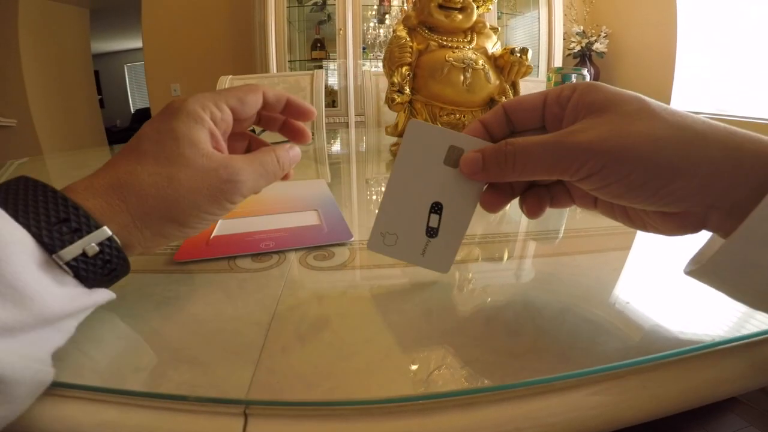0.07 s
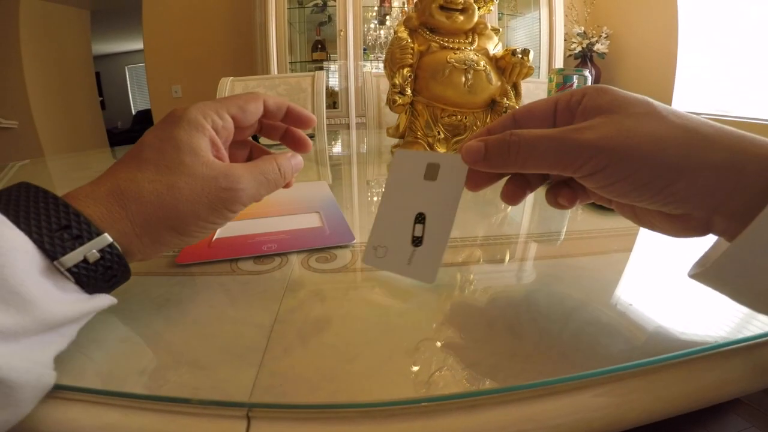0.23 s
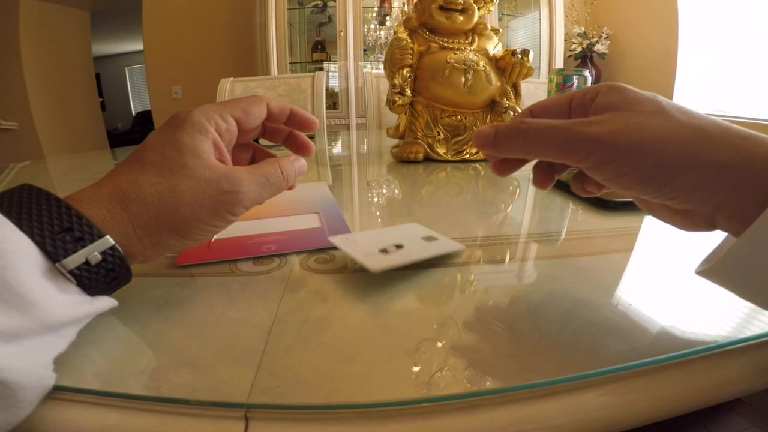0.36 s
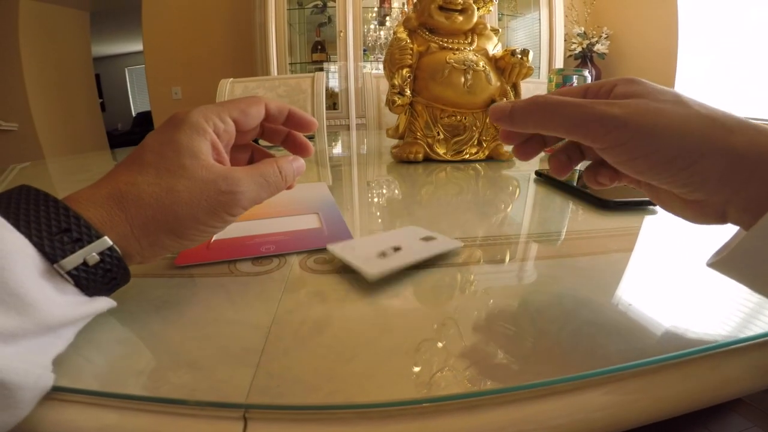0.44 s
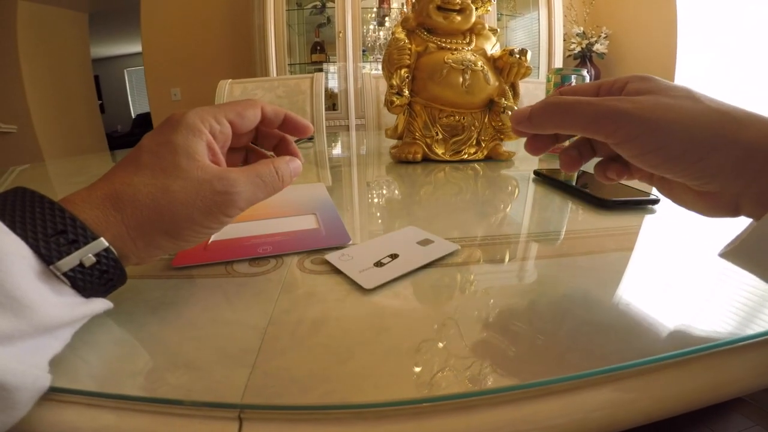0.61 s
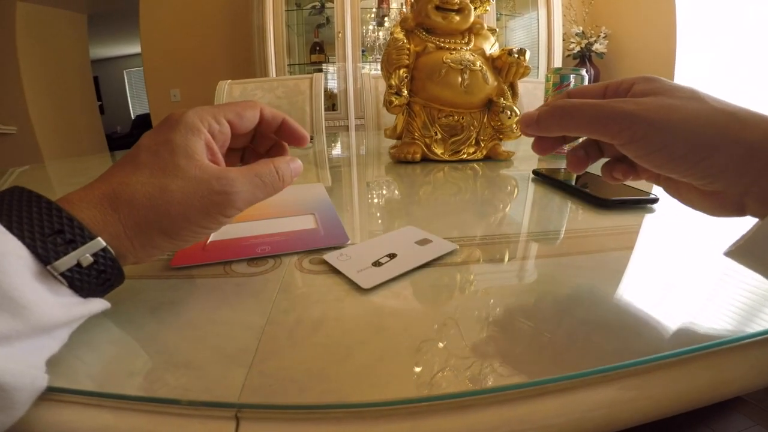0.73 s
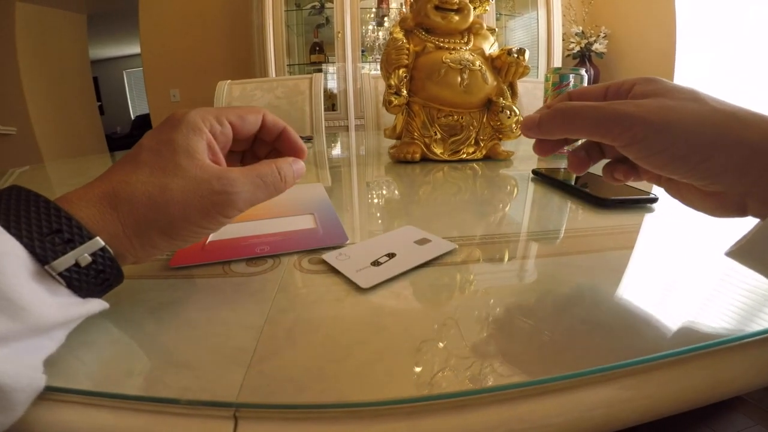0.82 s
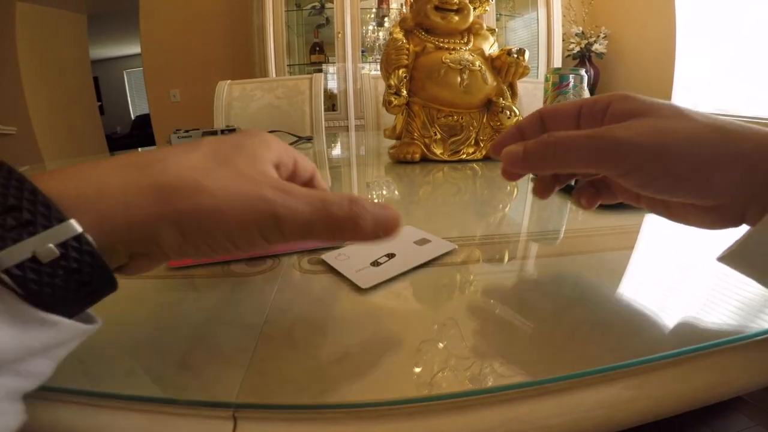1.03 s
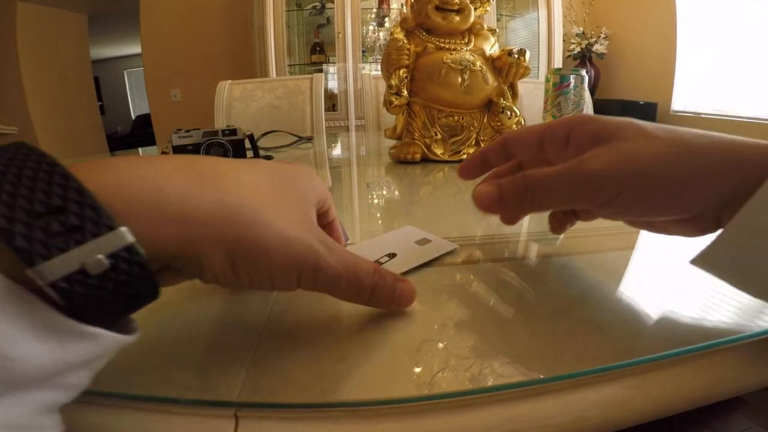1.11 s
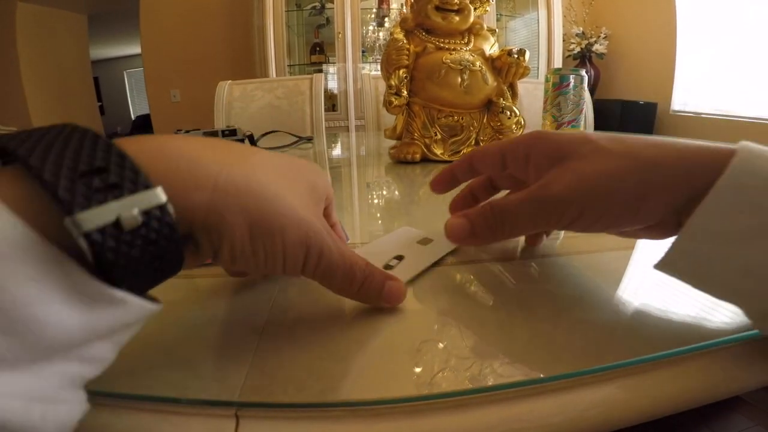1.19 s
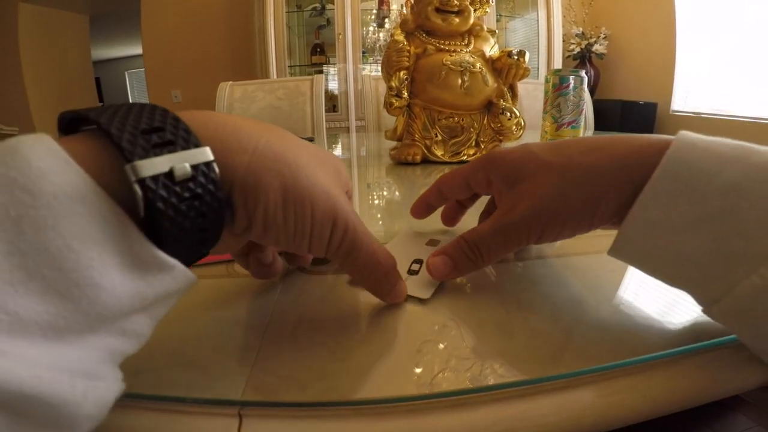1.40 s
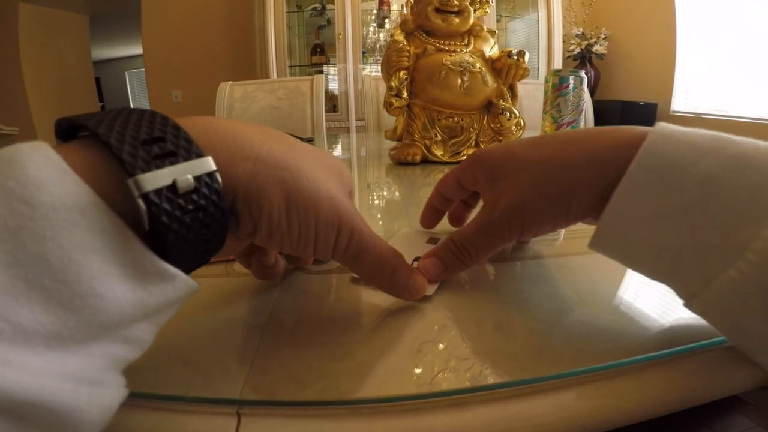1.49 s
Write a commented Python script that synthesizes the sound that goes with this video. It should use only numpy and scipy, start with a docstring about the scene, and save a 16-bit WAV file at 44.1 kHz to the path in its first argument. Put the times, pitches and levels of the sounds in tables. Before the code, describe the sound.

A metal card drops on a glass table, clinking and rattling flat, then faint finger taps.

```python
"""A metal card dropped on a glass table, heard on one microphone in a live room, after a dull knock.
It clinks on a corner and rings the glass, slaps over on a cushion of air, rattles and lies flat
while the room rings on. Then fingers tap the glass and slide the card over it. Sleeves, a rumble
and a faint hum lie underneath; the loudest blows push the recorder's limiter."""
import sys
import numpy as np
from scipy import signal
from scipy.fft import rfft, irfft, next_fast_len
from scipy.io import wavfile
from scipy.ndimage import uniform_filter1d

SR = 44100
rng = np.random.default_rng(int(sys.argv[2]) if len(sys.argv) > 2 else 0)


def wav_out(sig):
    """Save sig, one row per channel (or a flat mono array), as 16-bit PCM at SR to the path in sys.argv[1]."""
    wavfile.write(sys.argv[1], SR, np.round(np.clip(np.atleast_2d(sig).T, -1, 1) * 32767).astype(np.int16))


N = 68355
T = np.arange(N) / SR

# the card meeting the glass: t/s, ring/dB, crack/dB, spot (0 corner, 1 edge), damping/dB (sign unused)
CONTACTS = [(.2480, -16.5, -5.5, 0, 0), (.2750, -25, -20, 0, 1), (.2855, -27.5, -24, 0, 5),
            (.2940, -26.5, -14.5, 0.46, 8), (.3235, -43.5, -26.5, 0, 3.5), (0.3967, -22, 0.5, 1, -1.5),
            (.4035, -22, -5.5, 0.74, 13), (.4235, -36, -19.5, 0.91, 4), (.4578, -29.5, -18, 1, -3),
            (.5115, -35.5, -23.5, 0.71, 9), (.5240, -53, -19, 1, -13), (.5265, -24, -19, 1, 30),
            (.5322, -37, -17.5, 0.6, 36), (.5586, -33, -20.5, 1, 18), (.5770, -27, -17, 0.97, 34),
            (.5855, -40, -30, 1, 24), (.5925, -37.5, -24.5, 0.42, 12.5), (.6020, -37, -25.5, 1, 14),
            (.6140, -39, -33, 0.31, 10), (.6225, -54, -51, 0.81, 27)]
# spectrum of a hard contact: f/Hz, level/dB
CONTACT_SPECTRUM = [(100, -12), (400, -10.5), (700, -5.5), (1300, -3.5), (2000, -9.5), (3200, -9),
                    (4200, -4.5), (6000, -3.5), (8000, -8), (12000, 3), (15000, -3)]


def amp(db):
    """Decibels to gain."""
    return 10 ** (np.asarray(db) / 20)


def along(points, hz):
    """Read (frequency, value) points at hz on a log axis."""
    f, values = np.transpose(points)
    return np.interp(np.log(hz + 1), np.log(f + 1), values)


def filtered(x, response):
    """x through a frequency response."""
    size = next_fast_len(N + SR // 2)
    return irfft(rfft(x, size) * response(np.fft.rfftfreq(size, 1 / SR)), size)[:N]


def noise(spectrum, tilt_db=0, resonance=lambda hz: 1):
    """Coloured noise of rms 1, tilted per octave and shaped by any resonance."""
    white = rng.standard_normal(N)
    x = filtered(white, lambda hz: amp(along(spectrum, hz) + tilt_db * np.log2(hz + 1)) * resonance(hz))
    return x / x.std()


def fade(t60, t=T):
    """A decay of 60 dB in t60 seconds."""
    return amp(-60 * t / t60)


def at(start, x):
    """x delayed by start seconds."""
    return np.pad(x, (max(round(start * SR), 0), 0))[:N]


def ring(modes, scatter_db=4, detune=0.00092):
    """Struck modes as damped sines, a little different at every blow."""
    t = T[:SR // 3]
    x = np.zeros(len(t))
    for hz, db, t60 in modes:
        strength, pitch, phase = rng.standard_normal(3)
        sine = np.sin(2 * np.pi * (hz * (1 + detune * pitch) * t + phase))
        x += amp(db + scatter_db * strength) * fade(t60, t) * sine
    return np.pad(x, (0, N - len(t)))


def background():
    """Room tone at the microphone: moving sleeves, a low rumble, a faint hum and still air."""
    # swells of the sleeves and the rumble: t/s, level/dB
    sleeve_levels = [(0, -49.5), (.5, -50), (.8, -76.5), (1.05, -61.5), (1.2, -52.5), (1.4, -57),
                     (1.55, -50)]
    rumble_levels = [(0, -41), (.12, -48.5), (.45, -35.5), (.65, -57.5), (.93, -51), (1.0, -38),
                     (1.1, -48.5), (1.25, -43.5), (1.55, -41)]
    # spectra of the four layers: f/Hz, level/dB
    sleeve_spectrum = [(40, 4.5), (100, 4), (200, -1), (500, -8.5), (900, -22), (2000, -26), (6000, -40),
                       (15000, -42)]
    rumble_spectrum = [(5, -6), (15, 1), (30, -2.5), (60, -23.5), (120, -38), (400, -71.5)]
    hum_partials = [(99, -63.5), (198, -71.5)]
    air_spectrum = [(30, 9), (100, 3), (300, -7), (1000, -8.5), (4000, -13), (15000, -20.5)]
    sleeves = amp(np.interp(T, *np.transpose(sleeve_levels))) * noise(sleeve_spectrum)
    rumble = amp(np.interp(T, *np.transpose(rumble_levels))) * noise(rumble_spectrum)
    hum = sum(amp(db) * np.sin(2 * np.pi * (hz * T + rng.random())) for hz, db in hum_partials)
    return sleeves + rumble + hum + amp(-65) * noise(air_spectrum)


def slides():
    """Skin and card slide in short, soft swells of hiss."""
    # strokes: centre t/s, Gaussian width/s, level/dB
    strokes = [(0.03, 0.017, -59.5), (0.138, 0.014, -57.5), (1.257, 0.013, -52.5), (1.381, 0.013, -58.5),
               (1.492, 0.048, -64.5)]
    # friction hiss: f/Hz, level/dB
    hiss_spectrum = [(500, -12.5), (2500, -17), (4500, -1.5), (6500, -4), (9000, -2), (13000, -2.5),
                     (15500, -4)]
    swells = sum(amp(db) * np.exp(-.5 * ((T - centre) / width) ** 2) for centre, width, db in strokes)
    return swells * noise(hiss_spectrum)


def knock():
    """One dull, hollow knock with a small tick at first contact."""
    # hollow body: f/Hz, level/dB
    body_spectrum = [(100, -22.5), (330, -14), (530, 2.5), (680, 1.5), (850, -3.5), (1050, -0.5),
                     (1400, 1.5), (1800, -8.5), (2400, -17.5), (5000, -31), (10000, -39), (15000, -48)]
    body = amp(-24) * noise(body_spectrum) * fade(t60=0.073)
    tick = amp(-28.5) * noise(CONTACT_SPECTRUM, tilt_db=-5.5) * fade(t60=0.017)
    return at(0.074, body + tick)


def crack(mode_hz, mode_db, edge, width_hz=220, scatter_db=5.5, valley_db=-21.5):
    """Contact noise gathers round the card's modes, each spot favouring others; an edge is brighter."""
    gains = amp(mode_db + scatter_db * rng.standard_normal(len(mode_hz)))
    grid_hz = np.linspace(0, SR / 2, 2048)
    peaks = sum(gain / (1 + ((grid_hz - hz) / width_hz) ** 2) for hz, gain in zip(mode_hz, gains))
    response = amp(valley_db) + peaks
    burst = noise(CONTACT_SPECTRUM, tilt_db=edge, resonance=lambda hz: np.interp(hz, grid_hz, response))
    corner_t60, edge_t60 = 0.06, 0.044
    return burst * fade(corner_t60 + edge * (edge_t60 - corner_t60))


def card():
    """Each contact with the glass damps the earlier ringing, cracks and rings the card anew."""
    # the card's modes: f/Hz, corner-struck level/dB, edge-struck level/dB, free t60/s
    modes = [(1337, -6, -16, .3), (1655, -10, -35, .2), (2248, -22, -13, .6), (3088, -7, -15, .16),
             (3520, -3, -5, .3), (3668, -8, -25, .22), (4443, -18, -8, .25), (4640, -5, -20, .2),
             (4880, -18, -5, .35), (5593, -7, -7, .25), (5780, -12, -16, .2), (6325, -14, -14, .25),
             (6562, -4, -7, .33), (6864, -5, -2, .26), (7219, -8, -16, .24), (7607, -9, -4, .3),
             (7830, -13, -9, .22), (8530, -5, -8, .24), (8795, -8, -4, .22), (8868, 0, -12, .19),
             (9796, -2, -9, .18), (10030, -13, -13, .2), (10470, -8, -4, .17), (11108, -11, -4, .18),
             (11392, -4, -3, .24), (12110, -9, -1, .12), (12268, 0, -10, .19), (12790, -6, -5, .13),
             (12965, -4, -12, .18), (13192, -12, -3, .12), (13867, -3, -10, .2), (14617, -6, -16, .2),
             (14790, -6, -13, .2)]
    # how well the modes radiate: f/Hz, level/dB
    radiation = [(1300, 0), (3000, -2.5), (6000, 0), (9000, 0), (12000, -2), (15000, 0)]
    damping_s, glass_loss_db_per_s = 0.009, 22
    hz, corner_db, edge_db, t60 = np.transpose(modes)
    ringing, cracks = np.zeros(N), np.zeros(N)
    for start, ring_db, crack_db, edge, damp_db in CONTACTS:
        ringing *= amp(-abs(damp_db) * np.clip((T - start) / damping_s, 0, 1))
        mode_db = corner_db + edge * (edge_db - corner_db) + along(radiation, hz)
        ringing += at(start, amp(ring_db - glass_loss_db_per_s * T) * ring(zip(hz, mode_db, t60)))
        cracks += at(start, amp(crack_db) * crack(hz, mode_db, edge))
    return ringing + cracks


def glass_top():
    """The card's first blow rings the table top."""
    # low modes of the glass: f/Hz, level/dB, t60/s
    modes = [(460, 0.5, 0.26), (507, 1, 0.18), (628, 0, .2), (735, -2, .22), (968, -5.5, 0.11),
             (1190, 2, 0.23)]
    # wash of its dense small modes: f/Hz, level/dB
    wash_spectrum = [(200, -10), (500, -9), (750, -3.5), (950, -7.5), (1300, -1), (1900, -3), (2600, 0),
                     (4000, -1), (9000, -15), (15000, -31)]
    tones = amp(-39.5) * ring(modes)
    wash = amp(-25) * noise(wash_spectrum) * fade(t60=0.45)
    return at(CONTACTS[0][0], tones + wash)


def slaps(puff_s=0.0012, puff_delay_s=0.0012):
    """Landing flat, the card claps and squeezes a puff of air from under itself."""
    # flat landings: t/s, clap/dB, puff/dB
    landings = [(0.396, 1.5, 1.5), (0.5266, -15.5, -26), (0.5765, -10, -31)]
    # the clap: f/Hz, level/dB
    clap_spectrum = [(100, -11), (400, -16.5), (750, -10.5), (1200, -15), (2000, -17.5), (2500, -7.5),
                     (2800, -0.5), (3150, 11), (3600, -9.5), (4200, -13), (5200, -11.5), (5900, 6.5),
                     (6500, 2), (7600, -11.5), (8900, 5.5), (10000, -4), (12000, 4), (15000, -13)]
    age = T / puff_s
    puff = -np.e * age * (1 - age / 3) * np.exp(-age)
    x = np.zeros(N)
    for start, clap_db, puff_db in landings:
        x += at(start, amp(clap_db) * noise(clap_spectrum) * fade(t60=0.024))
        x += at(start + puff_delay_s, amp(puff_db) * puff)
    return x


def finger_taps():
    """Fingertips thud on the glass and thump the whole table; the nails click."""
    # taps: t/s, pad/dB, nail/dB
    taps = [(1.1485, -41, -64), (1.3601, -45.5, -43.5), (1.543, -46.5, -54.5)]
    # spectra of pad and nail: f/Hz, level/dB
    pad_spectrum = [(90, 0.5), (200, -7), (450, 9), (900, -1.5), (1600, -4.5), (2400, -32), (3600, -16),
                    (7000, -15.5), (15000, -34)]
    nail_spectrum = [(300, -13), (1400, 6), (2400, -13), (3500, 4), (5000, -7), (9000, -15), (15000, -9)]
    # modes of the whole table: f/Hz, level/dB, t60/s
    table_modes = [(99.5, -1.5, 0.14), (200.2, -14, 0.12)]
    x = np.zeros(N)
    for start, pad_db, nail_db in taps:
        thud = noise(pad_spectrum) * fade(t60=0.036) + ring(table_modes)
        click = noise(nail_spectrum) * fade(t60=0.017)
        x += at(start, amp(pad_db) * thud + amp(nail_db) * click)
    return x


def room(x, tail_db, early_db=-18.5, wall_delay_s=0.008, low_cut_hz=588):
    """Direct sound at the microphone, then early reflections and a long tail, both thin in the bass."""
    # reverberation time: f/Hz, t60/s
    decay_times = [(100, 0.88), (500, 1), (1500, 1), (2300, 1), (4500, 0.99), (7000, .85), (10500, .7),
                   (13000, 0.33), (15000, .46)]
    hz, t, spectrogram = signal.stft(rng.standard_normal(N), SR, nperseg=256)
    spectrogram *= fade(along(decay_times, hz)[:, None], t)
    tail = signal.istft(spectrogram, SR, nperseg=256)[1][:N]
    early = rng.standard_normal(N) * fade(t60=0.11)
    response = amp(tail_db) * at(wall_delay_s, tail / np.linalg.norm(tail))
    response += amp(early_db) * early / np.linalg.norm(early)
    reverb = signal.fftconvolve(x, response)[:N]
    return x + filtered(reverb, lambda f: 1j * f / (low_cut_hz + 1j * f))


def limiter(x, limit_db=-1, look_ahead_s=0.023, release_db_per_s=300):
    """The recorder's gain ducks just ahead of a loud peak and recovers steadily."""
    over_db = np.maximum(20 * np.log10(np.abs(x) + 1e-9) - limit_db, 0)
    held_db = np.maximum.accumulate(over_db + release_db_per_s * T) - release_db_per_s * T
    ahead_db = np.interp(T + look_ahead_s, T, held_db)
    return x * amp(-uniform_filter1d(ahead_db, size=600))


def scene():
    """One room, in mono: the card sounds close, the knock and the fingers carry more of the room."""
    drop = room(card() + glass_top(), tail_db=-17.5) + room(slaps(), tail_db=-22)
    thud = room(knock(), tail_db=-6.5)
    fingers = room(finger_taps() + slides(), tail_db=-6)
    return (drop + thud + fingers + background())[None]


def record(dry):
    """The recorder limits and softly clips the loudest blows, then cuts the highest treble."""
    ceiling, top_hz = 1.08, 15250
    limited = limiter(dry[0])
    clipped = limited / (1 + np.abs(limited / ceiling) ** 8) ** (1 / 8)
    return filtered(clipped, lambda hz: 1 / np.sqrt(1 + (hz / top_hz) ** 160))[None]


dry = scene()
out = record(dry)
wav_out(out)
```